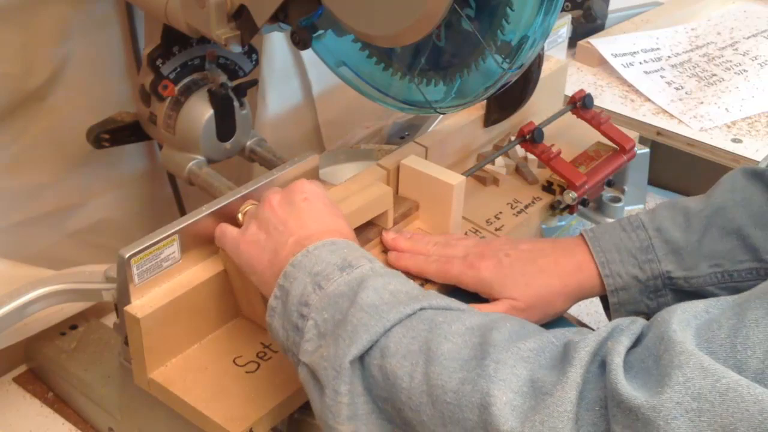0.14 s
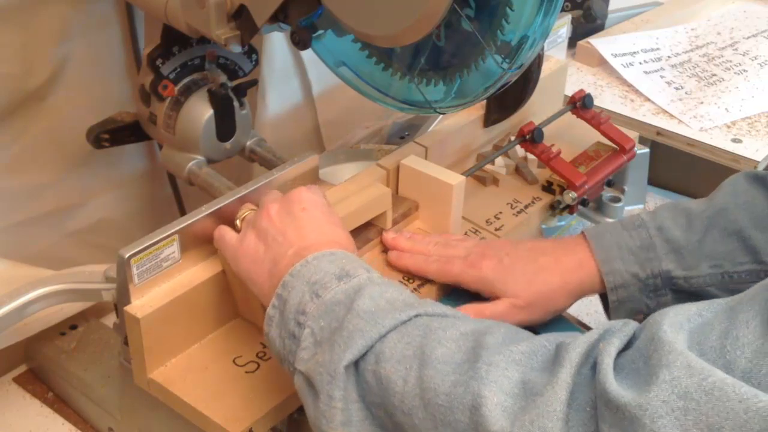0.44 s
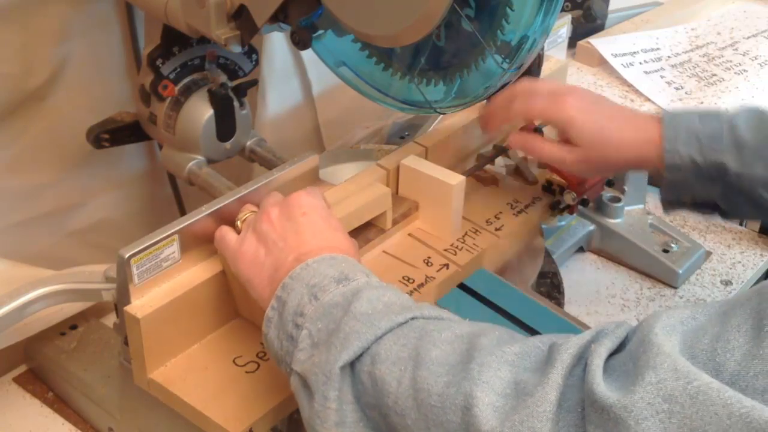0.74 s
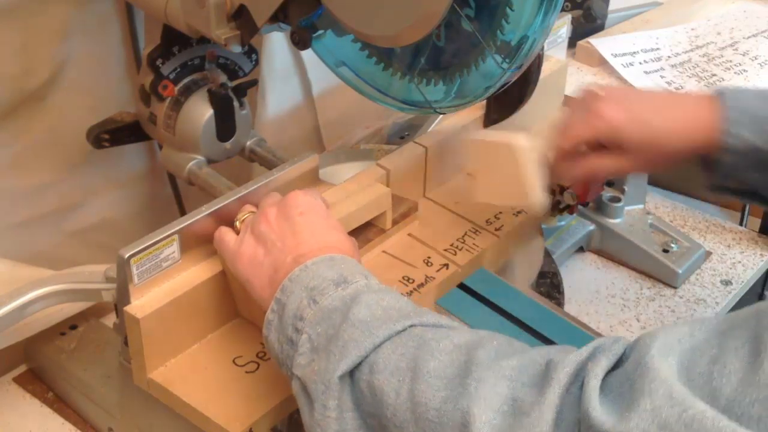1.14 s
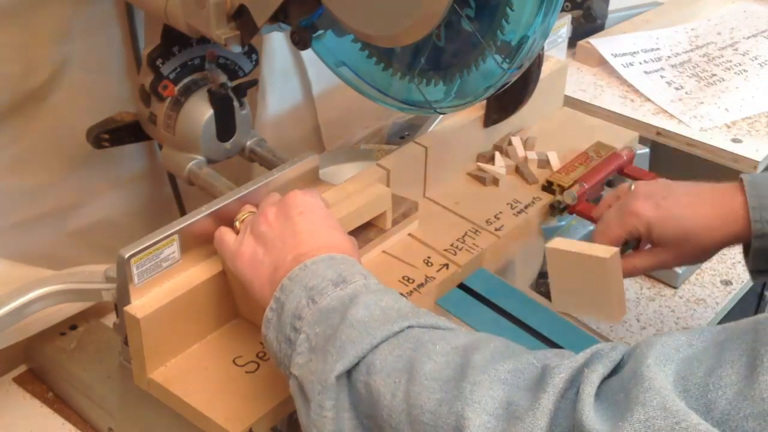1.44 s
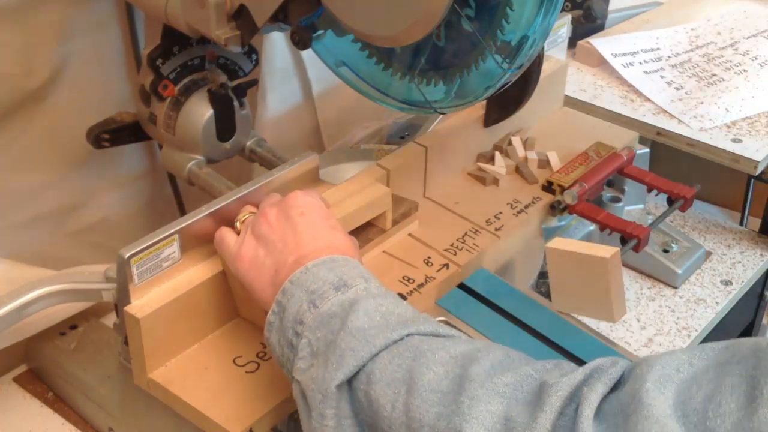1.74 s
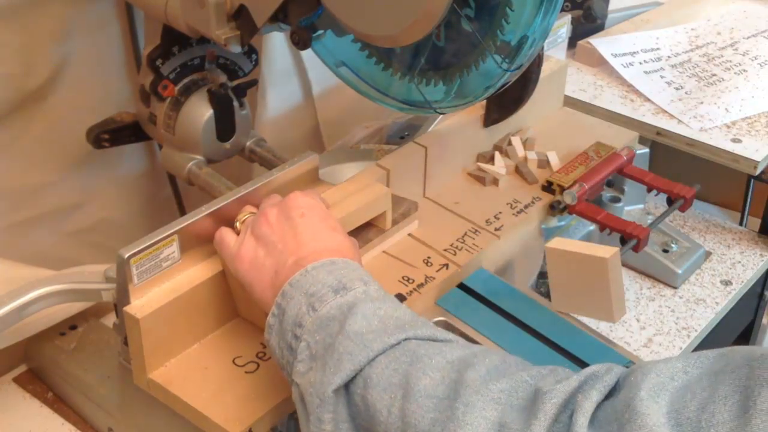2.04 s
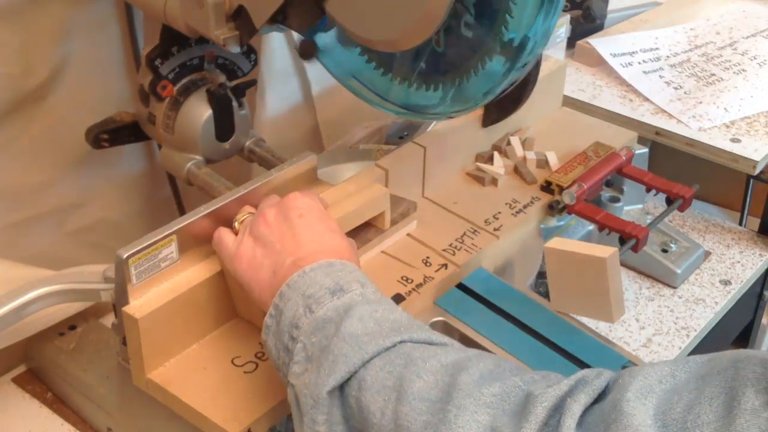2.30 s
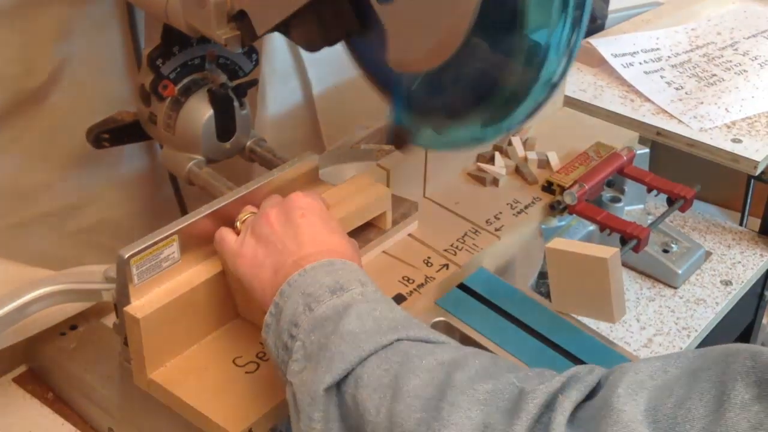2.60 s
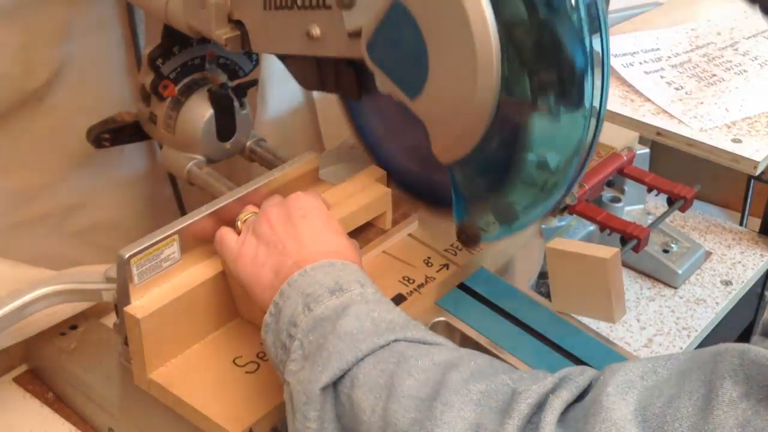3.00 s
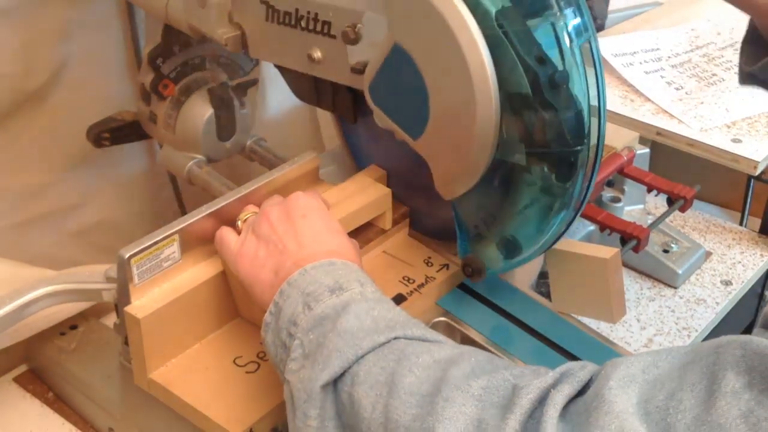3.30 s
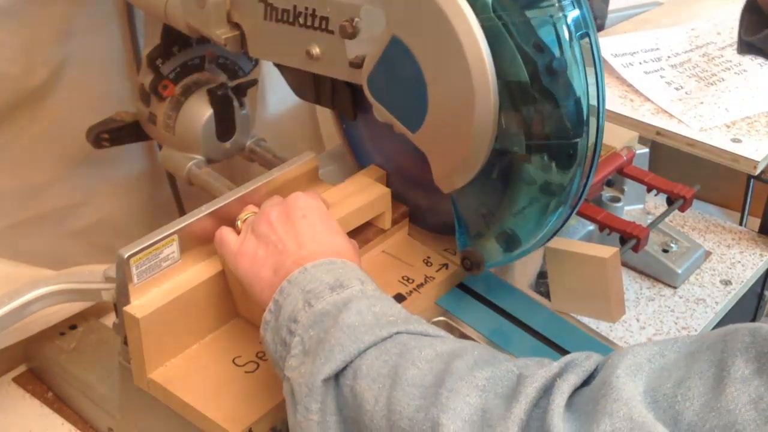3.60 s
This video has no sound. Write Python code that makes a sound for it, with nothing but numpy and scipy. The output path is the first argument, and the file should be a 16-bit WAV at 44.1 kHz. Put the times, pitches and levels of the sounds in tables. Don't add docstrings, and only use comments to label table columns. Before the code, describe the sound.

A miter saw is the main sound. Hands and offcuts rustle faintly over quiet room air, with small taps around 0.15 and 1.0-1.3 s. A wooden block lands with a quick double clack at 1.4 s; light ticks follow. Trigger clicks at 2.2 s start a growl that climbs into a loud, distorted whining roar by 3 s, holds, then drops in pitch from 3.6 s as it brakes.

```python
import sys
import numpy as np
from scipy import signal
from scipy.fft import rfft, irfft, next_fast_len
from scipy.io import wavfile
from scipy.ndimage import uniform_filter1d, map_coordinates

SR = 44100
rng = np.random.default_rng(int(sys.argv[2]) if len(sys.argv) > 2 else 0)


def generate_wav(signal):
    frames = np.transpose(np.atleast_2d(signal))
    scaled = np.clip(frames, -1, 1) * 32767
    pcm = np.round(scaled).astype(np.int16)
    wavfile.write(sys.argv[1], SR, pcm)


def field_ratio(decibels):
    return 10 ** (np.asarray(decibels, dtype=float) / 20)


N = 165375
T = np.arange(N) / SR


def unit(x):
    return x / np.sqrt(np.mean(x ** 2) + 1e-20)


def along(points, hz):
    f, v = np.transpose(points)
    return np.interp(np.log(hz + 1), np.log(f + 1), v)


def curves(rows):
    s, *columns = np.transpose(rows)
    return [np.interp(T, s, column) for column in columns]


def wobble(rate_hz):
    return map_coordinates(rng.standard_normal(1000), [np.minimum(T * rate_hz, 990)])


def placed(start_s, x):
    return np.pad(x, (round(start_s * SR), N))[:N]


def filtered(x, response):
    m = next_fast_len(x.shape[-1] + SR // 4, True)
    spectrum = rfft(x, m) * response(np.fft.rfftfreq(m, 1 / SR))
    return irfft(spectrum, m)[..., :x.shape[-1]]


def peak(f, hz, width_hz):
    damping = 1j * f * width_hz
    return damping / (hz * hz - f * f + damping + 1e-9)


def rush(spectrum, patchy_db):
    z = signal.stft(rng.standard_normal(N), nperseg=512)[2]
    patches = uniform_filter1d(rng.standard_normal(z.shape), 5, 0)
    patches = unit(uniform_filter1d(patches, 10, 1))
    x = signal.istft(z * field_ratio(patchy_db * patches), nperseg=512)[1][:N]
    return unit(filtered(x, lambda hz: field_ratio(along(spectrum, hz))))


def tone(hz, width_hz, flutter_db):
    phase = 2 * np.pi * np.cumsum(hz + width_hz * wobble(70)) / SR
    return np.sqrt(2) * field_ratio(flutter_db * wobble(45)) * np.sin(phase)


def narrow(hz, width_hz, steady=0, t=T):
    knots = rng.standard_normal((2, 2000))
    a, b = [np.interp(t * width_hz, np.arange(2000), k) for k in knots]
    phase = 2 * np.pi * np.cumsum(hz + 0 * t) / SR
    return unit((a + steady) * np.cos(phase) + b * np.sin(phase))


def burst(level_db, t60_s, attack_s):
    push_db, snap_db, snap_t60_s = 18, 1.5, 0.011
    t = T[:SR // 2]
    shape = field_ratio(-60 * t / t60_s) + field_ratio(snap_db - 60 * t / snap_t60_s)
    x = shape * (1 - np.exp(-t / attack_s)) * rng.standard_normal(len(t))
    x[0] = field_ratio(push_db)
    return field_ratio(level_db) * x


def ring(start_s, level_db, modes):
    t = T[:SR // 2]
    vibration = sum(field_ratio(level_db + db - 60 * t / t60_s) * np.sin(2 * np.pi * hz * t)
                    for hz, db, t60_s in modes)
    return placed(start_s, vibration)


# start_s, level_db
RUSTLE_FADE = [(0, -52), (.15, -53.5), (.22, -54), (.3, -56), (.45, -57.5), (.6, -60), (.7, -60.5),
               (.8, -64.5), (1.1, -65.5)]
# pitch_hz, level_db (per Hz)
RUSTLE_SPECTRUM = [(24, -63), (40, -32.5), (229, -0.5), (394, -4.5), (616, -11.5), (727, -7), (1910, -20),
                   (10200, -29), (11200, -36), (14600, -68), (22000, -120)]
AIR_SPECTRUM = [(24, -70), (40, -33), (213, 8), (290, -10), (464, -2), (1110, -17), (1190, -8),
                (1410, -12.5), (11200, -27), (14600, -50), (22000, -120)]


def background():
    rustle = field_ratio(curves(RUSTLE_FADE)[0] + 0.6 * wobble(12.76)) * rush(RUSTLE_SPECTRUM, patchy_db=1.0)
    air = field_ratio(-70 + 0.18 * wobble(5.6)) * rush(AIR_SPECTRUM, patchy_db=5.0)
    return rustle + air


# pitch_hz, t60_s
SHOP_DECAY = [(200, 0.45), (2000, 0.32), (10000, 0.26)]


def shop(x):
    hz, t, z = signal.stft(rng.standard_normal(SR // 2), SR, nperseg=256)
    decay = field_ratio(-60 * t / along(SHOP_DECAY, hz)[:, None])
    tail = signal.istft(z * decay, SR, nperseg=256)[1]
    delayed = np.pad(x, (200, 0))
    return signal.fftconvolve(delayed, tail / np.linalg.norm(tail))[:N]


# start_s, level_db, pitch_hz, width_hz, t60_s
KNOCK_EVENTS = [(0.002, -59, 4350, 400, .2), (.14, -60, 4400, 300, .5), (.165, -59.5, 2900, 1500, 0.27),
                (.168, -43.5, 396, 150, 0.27), (0.981, -49, 706, 590, 0.11),
                (1.131, -49.5, 2370, 2980, 0.085), (1.133, -49, 650, 510, 0.11),
                (1.145, -58.5, 2600, 500, 0.35), (1.327, -44, 790, 400, 0.076),
                (1.84, -46.5, 2630, 5970, 0.083), (1.844, -50.5, 200, 300, 0.38),
                (1.9957, -44, 3430, 3380, 0.13), (2.193, -51.5, 3530, 3000, 0.04),
                (2.198, -54, 2000, 3000, .1), (2.2157, -39.5, 2230, 5000, 0.06),
                (2.2213, -29.5, 4070, 5560, 0.049), (2.2295, -35, 3270, 1960, 0.069),
                (2.217, -41, 380, 204, 0.34), (2.222, -39.5, 1250, 1500, 0.3),
                (2.268, -36.5, 675, 150, 0.28), (2.328, -46, 2800, 3500, 0.089),
                (2.419, -42.5, 2980, 7100, 0.11)]


def knocks():
    def knock(level_db, hz, width_hz, t60_s):
        even_power = np.sqrt(SR / 8 / width_hz)
        return filtered(burst(level_db, t60_s, 0.00034),
                        lambda f: peak(f, hz, width_hz) ** 2 * even_power)

    return sum(placed(s, knock(db, hz, width_hz, t60_s))
               for s, db, hz, width_hz, t60_s in KNOCK_EVENTS)


# pitch_hz, level_db, t60_s
CLAMP_MODES = [(720, -2, 0.12), (1012, -12, 0.1), (2056, -1, 0.07), (2266, 0, 0.08), (2600, -8, 0.1),
               (3779, -10, 0.09), (4404, -11, .06)]
# pitch_hz, level_db, t60_s
GUARD_MODES = [(2492, -2, 0.04), (3295, -1, 0.08), (4320, -14, .2), (4587, -8, 0.14)]


def clamp_and_guard():
    return ring(1.1315, -56.5, CLAMP_MODES) + ring(1.9955, -50.5, GUARD_MODES)


# pitch_hz, width_hz, level_db
WOOD_MODES = [(430, 53, 2.5), (715, 150, -4), (1080, 210, -7), (1640, 200, -11.5), (2320, 350, -14.5),
              (5150, 1600, -23.5), (8650, 2700, -21.5)]
# start_s (after landing), level_db
BLOCK_CONTACTS = [
    (0, 2),
    (.005, 4.5),
    (.011, -0.5),
    (0.027, -5.5),
]
# pitch_hz, level_db, t60_s
BLOCK_RING_MODES = [(440, -5, .18), (720, -1, 0.1), (1020, -14, .15), (1136, -13, .13), (1238, -10, .12),
                    (1620, -11.5, 0.22), (2420, -12, .12)]


def block():
    land_s, level_db = 1.4225, -28

    def blows(t60_s):
        return sum(placed(land_s + delay_s, burst(level_db + db, t60_s, 0.00052))
                   for delay_s, db in BLOCK_CONTACTS)

    def wood(modes):
        return lambda f: sum((-1) ** k * field_ratio(db + 7.0) * peak(f, hz, width_hz)
                             for k, (hz, width_hz, db) in enumerate(modes))

    low = filtered(blows(0.13), wood(WOOD_MODES[:4]))
    high = filtered(blows(0.08), wood(WOOD_MODES[4:]))
    return low + high + ring(land_s, -36.5, BLOCK_RING_MODES)


# start_s, level_db
STARTING_CURRENT = [(2.24, -81), (2.27, -57.5), (2.31, -55.5), (2.36, -44), (2.44, -35), (2.54, -30),
                    (2.64, -34.5), (2.72, -42.5), (2.85, -50)]
# pitch_hz, level_db
STATOR_MODES = [(425, -1), (486, -13), (549, -7), (662, -2.5), (732, -3.5), (860, -6.5), (969, -6.5),
                (1098, -17)]
# pitch_hz, level_db
MAINS_HARMONICS = [(238, -0.5), (356, -1)]


def growl():
    stator = sum(field_ratio(db) * narrow(hz, 70) for hz, db in STATOR_MODES)
    hum = sum(field_ratio(db) * tone(hz, 9, flutter_db=2.5) for hz, db in MAINS_HARMONICS)
    fall_db = 60 * np.clip(T - STARTING_CURRENT[-1][0], 0, None)
    level_db = curves(STARTING_CURRENT)[0] + 0.5 - fall_db
    return filtered(field_ratio(level_db) * unit(stator + hum), lambda f: 1 / (1 + (150 / (f + 1)) ** 8))


# start_s, level_db
FAN_LEVEL = [(2.4, -71), (2.5, -74), (2.6, -29.5), (2.75, -26.5), (2.85, -32.5), (3.1, -26), (3.4, -36.5),
             (3.75, -31.5)]


def fan():
    hiss = filtered(rush([(1, 0)], patchy_db=2.5), lambda f: peak(f, 8600, 3700) ** 2)
    return field_ratio(curves(FAN_LEVEL)[0]) * unit(hiss)


# start_s, pitch_hz, level_db
BLADE_WHISTLE = [(2.85, 1850, -95), (2.9, 1999, -55), (2.93, 2130, -35), (2.98, 2370, -32),
                 (3.05, 2700, -37), (3.12, 2910, -47), (3.2, 3240, -39), (3.26, 3430, -35),
                 (3.33, 3470, -70)]


def blade():
    hz, level_db = curves(BLADE_WHISTLE)
    return field_ratio(level_db) * narrow(hz, 190)


# start_s (middle), length_s, pitch_hz, level_db
SINGING_MODES = [(2.501, 0.07, 8200, -46.5), (2.503, 0.073, 660, -40), (2.575, 0.051, 720, -34),
                 (2.626, .05, 405, -40), (2.682, 0.044, 364, -34.5), (2.67, 0.066, 870, -33),
                 (2.701, .05, 8000, -30), (2.741, .06, 9000, -33), (2.772, .06, 1110, -37),
                 (2.79, .05, 6500, -34), (2.873, 0.093, 3156, -21.5), (2.915, .04, 1310, -33),
                 (2.964, 0.041, 1365, -29), (2.97, 0.051, 2350, -31), (3.03, 0.051, 1310, -30),
                 (3.05, .04, 2700, -29.5), (3.125, 0.05, 2780, -32.5), (3.17, 0.084, 7600, -33),
                 (3.19, 0.18, 3800, -35), (3.266, 0.1, 3420, -28), (3.315, 0.047, 1300, -29),
                 (3.41, .15, 1290, -28.5), (3.38, 0.12, 2800, -35), (3.29, 0.62, 312, -44.5),
                 (3.491, 0.055, 4600, -33), (3.46, 0.097, 10150, -37.5), (3.53, .06, 1390, -34),
                 (3.501, 0.087, 2850, -40), (3.585, 0.07, 2880, -24.5), (3.614, 0.033, 8900, -30.5),
                 (3.703, .05, 7400, -35), (3.7, 0.039, 2150, -36), (3.74, 0.042, 893, -33.5),
                 (3.74, 0.052, 6650, -28)]


def singing():
    total = 0
    for middle_s, length_s, hz, db in SINGING_MODES:
        t = T[:int(2 * length_s * SR)]
        swell = np.exp(-(2 * (t / length_s - 1)) ** 4)
        mode = narrow(hz, 0.026 * hz + 12, steady=0.68, t=t)
        total = total + placed(middle_s - length_s, field_ratio(db) * swell * mode)
    return total


# start_s, pitch_hz (gear mesh), level_db of roar, brightness, mesh whine, other orders
MOTOR_RUN = [(2.24, 300, -58, -16.5, -64, -66), (2.4, 896, -39.5, -37, -74, -70),
             (2.5, 1355, -20.5, -12.5, -67, -44), (2.58, 1754, -28, 7.5, -50, -34),
             (2.68, 2198, -20.5, -1.5, -33, -44), (2.8, 2875, -24, 3.5, -26.5, -30),
             (2.92, 3295, -18, -3.5, -28, -38), (2.95, 3460, -15, -7.5, -37, -30),
             (3.1, 3877, -20.5, -0.5, -36, -35), (3.25, 4207, -19, -1, -58, -36),
             (3.45, 4503, -15, -6.5, -44, -39), (3.56, 4510, -18.5, -2.5, -34, -30.5),
             (3.62, 4080, -20, -1.5, -54, -35), (3.69, 3330, -19, -1, -46, -34),
             (3.75, 2970, -24, 4, -49, -38)]
# multiple of mesh pitch, level_db, gain_db under the brake
GEAR_ORDERS = [(.295, -6, 2), (.41, -5, 0), (.64, -9, 7), (.81, -9, 0), (2.23, -14, 14)]
# pitch_hz, width_hz, level_db
CASING_MODES = [(718, 84, -5), (1374, 62, -2), (2270, 59, -15), (2880, 220, -2), (3420, 91, -6),
                (3800, 37, -5), (4540, 420, -8)]
# pitch_hz, level_db (per Hz)
ROAR_SPECTRUM = [(18, -49), (30, -19), (170, -21), (308, -8.5), (1060, -3), (1330, -2.5), (1750, -1),
                 (9190, -6), (11200, -13.5), (14600, -60), (22000, -120)]


def saw():
    mesh_hz, roar_db, bright_db, whine_db, orders_db = curves(MOTOR_RUN)

    roar = rush(ROAR_SPECTRUM, patchy_db=1.5)
    bass = filtered(roar, lambda f: 1 / (1 + (f / 150) ** 4))
    bass_gain = field_ratio(0.7 * (roar_db - roar_db.max()))
    roar = roar - bass * (1 - bass_gain)
    low = filtered(roar, lambda f: 1 / (1 + (f / 2200) ** 2))
    roar = field_ratio(roar_db) * (low + field_ratio(bright_db) * (roar - low))

    brake = np.clip((T - 3.57) / 0.025, 0, 1)
    orders = field_ratio(orders_db) * sum(field_ratio(db + brake * brake_db) * narrow(multiple * mesh_hz, 110)
                                  for multiple, db, brake_db in GEAR_ORDERS)

    def casing(f):
        return 0.71 + field_ratio(-1) * sum(field_ratio(db) * peak(f, hz, width_hz) for hz, width_hz, db in CASING_MODES)

    pure, fuzzy = tone(mesh_hz, 45.18, flutter_db=3.5), narrow(mesh_hz, 200)
    whine = field_ratio(whine_db) * (0.82 * pure + 0.47 * fuzzy)
    power_on = np.clip((T - MOTOR_RUN[0][0]) / 0.017, 0, 1)
    body = filtered(roar + orders, casing)
    return power_on * (body + whine + singing() + blade() + fan() + growl())


def scene():
    motor = saw()
    hits = filtered(knocks() + block() + clamp_and_guard(),
                    lambda f: (1j * f / (110 + 1j * f)) ** 2)
    mono = motor + field_ratio(-10.5) * shop(motor) + hits + field_ratio(-9.5) * shop(hits) + background()
    return np.array([mono, mono])


def roll_off(x):
    return signal.sosfilt(signal.butter(12, 11900, fs=SR, output="sos"), x)


def record(dry):
    overload, knee, top_hz = 0.16, 2.08, 10850
    soft = dry / (1 + np.abs(dry / overload) ** knee) ** (1 / knee)
    mix = filtered(soft, lambda hz: hz < top_hz)
    return roll_off(mix)


dry = scene()
out = record(dry)
generate_wav(out)
```